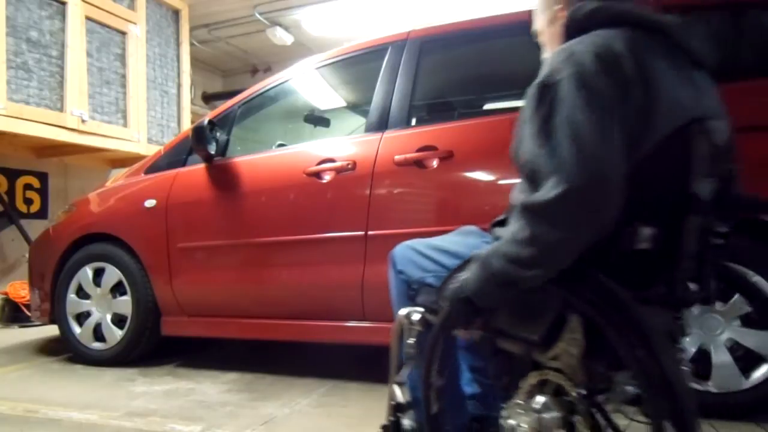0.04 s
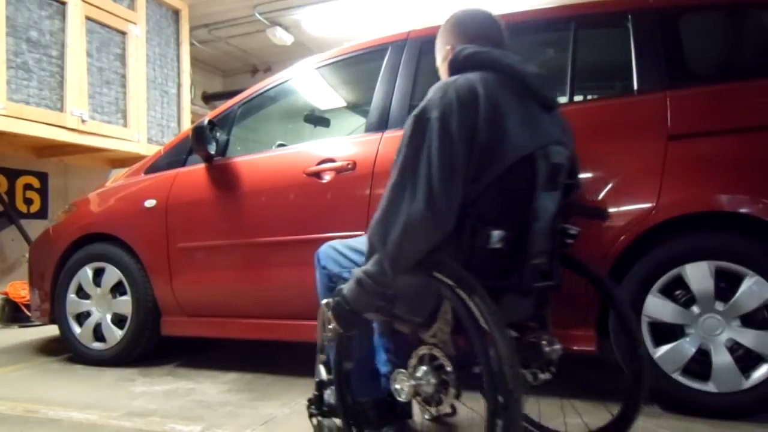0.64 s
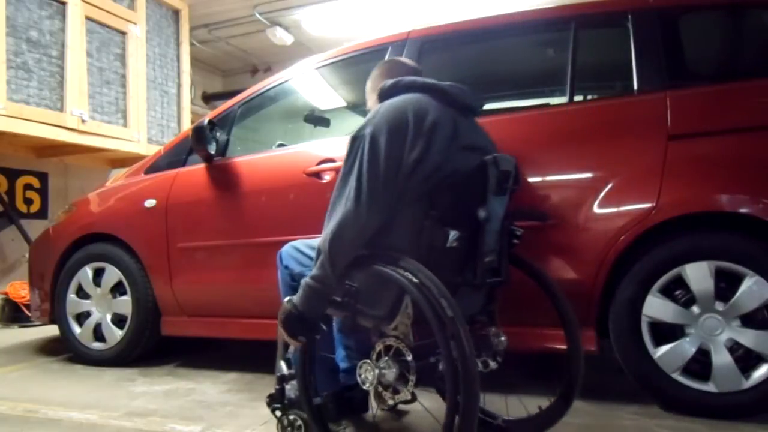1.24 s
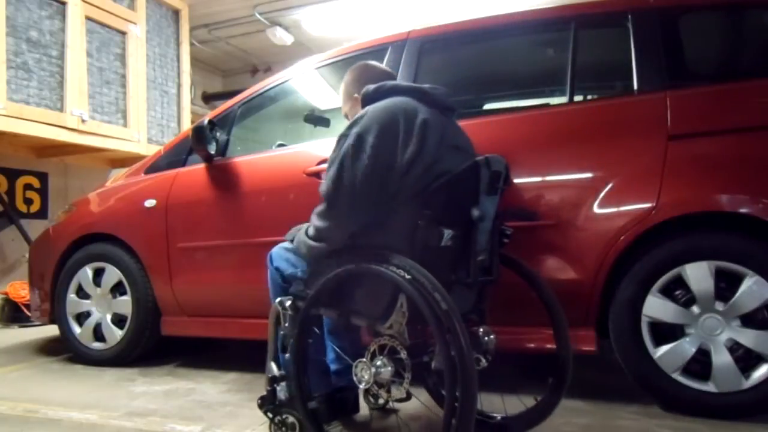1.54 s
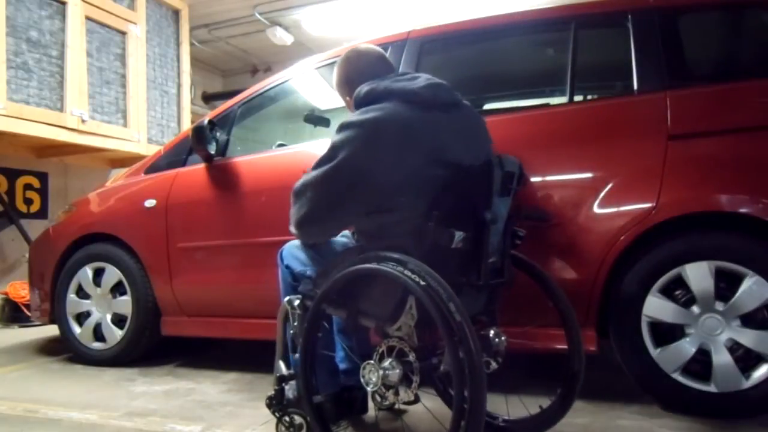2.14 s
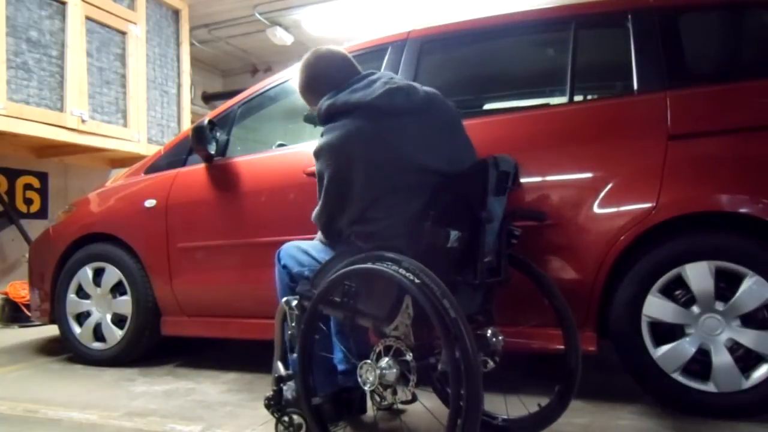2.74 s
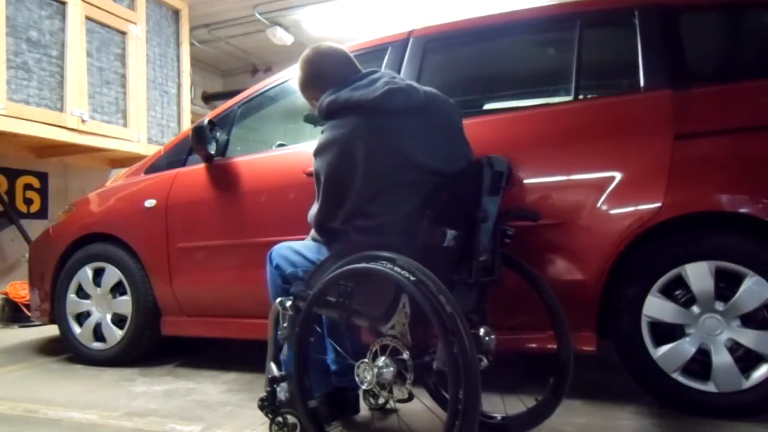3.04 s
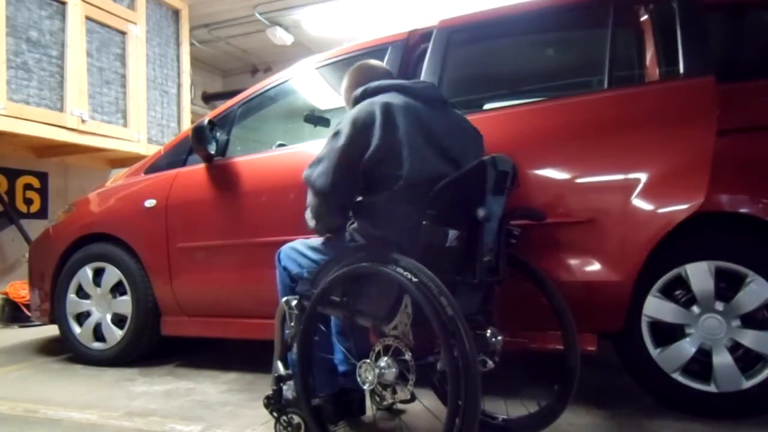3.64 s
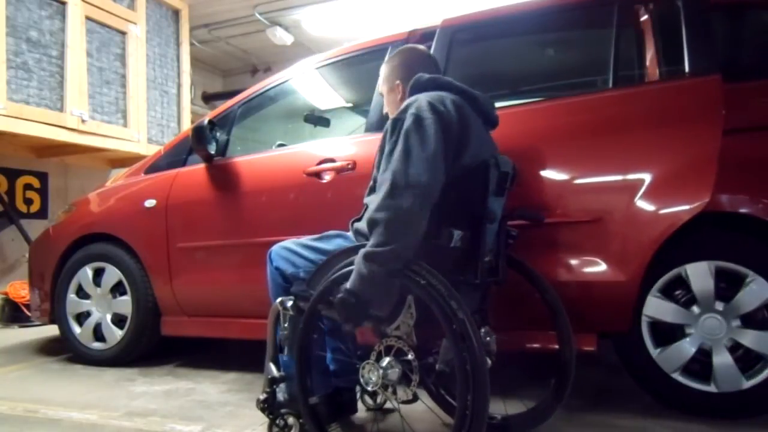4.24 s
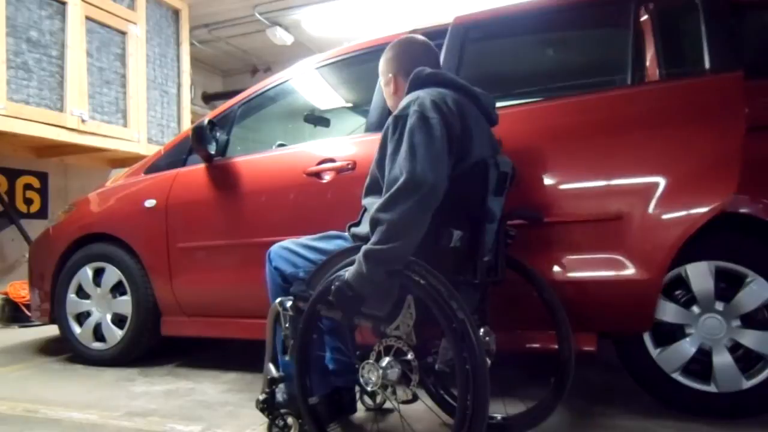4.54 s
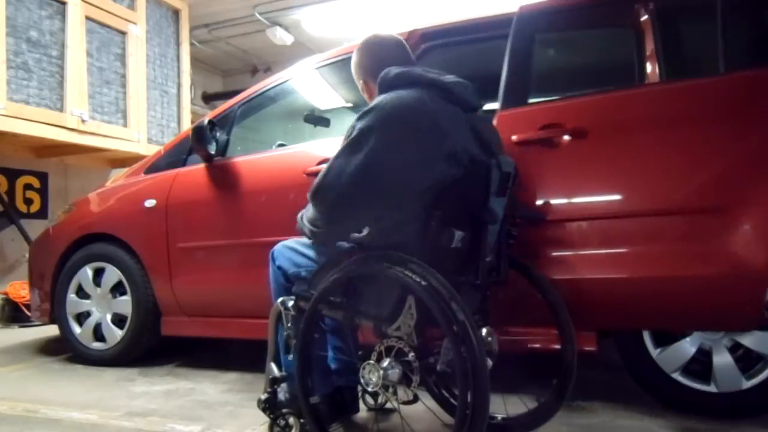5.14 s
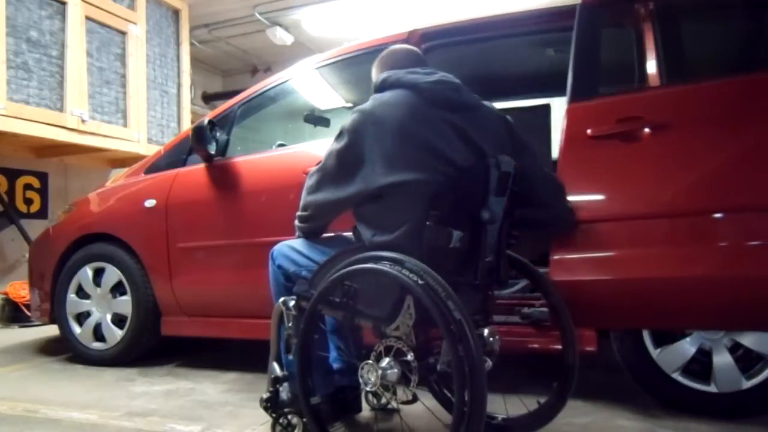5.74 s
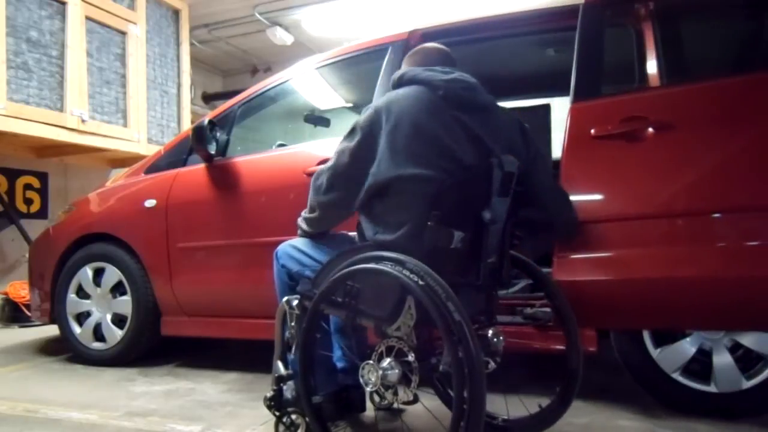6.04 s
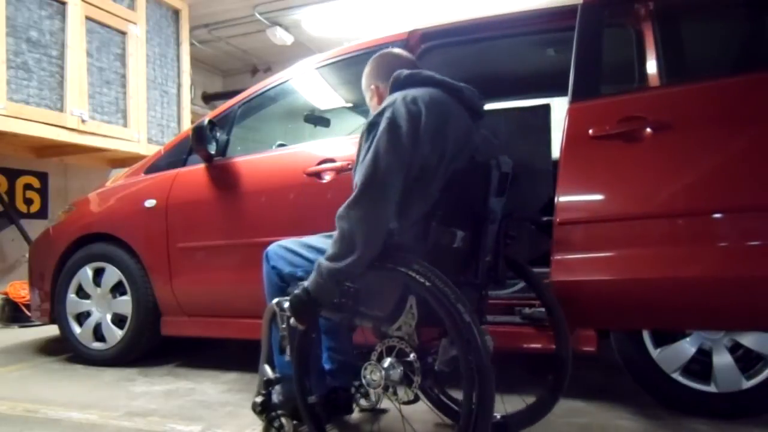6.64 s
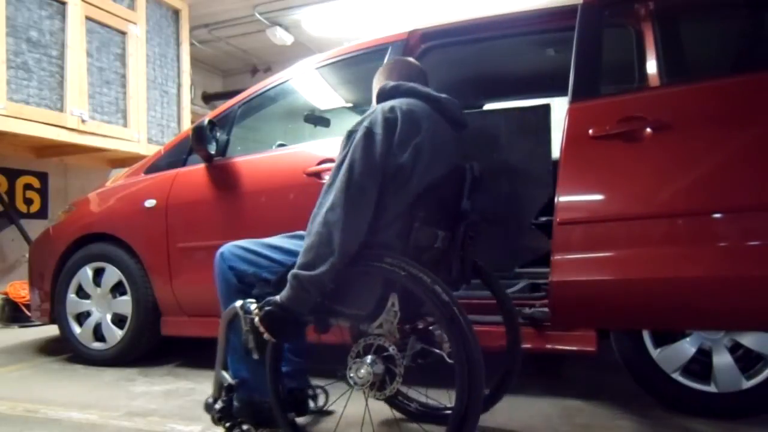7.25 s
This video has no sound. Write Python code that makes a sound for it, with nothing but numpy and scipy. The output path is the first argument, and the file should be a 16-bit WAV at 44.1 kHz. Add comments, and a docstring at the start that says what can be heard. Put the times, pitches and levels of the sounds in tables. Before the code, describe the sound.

A wheelchair rolls softly over concrete, its push rims hissing and its metal frame ticking and clanking. A van's sliding door then unlatches with a knock and a loud hollow bang, rumbles back along its track, and ends with sharp clacks and a low thump. The chair clanks again. Heard from close by, every knock rings in a bare garage.

```python
"""Wheelchair and van door in a garage

A wheelchair rolls up to a van, its frame ticking and clanking as it is turned and stopped.
The van's sliding door is unlatched, bangs, rumbles back along its track and thumps into its rubber stop.
The bare garage rings after every knock; a small stereo camera stands close by."""
import sys
import numpy as np
from scipy import signal
from scipy.fft import rfft, irfft, next_fast_len
from scipy.io import wavfile
from scipy.ndimage import map_coordinates

SR = 44100
rng = np.random.default_rng(int(sys.argv[2]) if len(sys.argv) > 2 else 0)


def generate_wav(sig):
    """Save sig (samples, or channels by samples) to the path in sys.argv[1] as 16-bit PCM at SR."""
    pcm = np.round(np.clip(np.atleast_2d(sig).T, -1, 1) * 32767).astype(np.int16)
    wavfile.write(sys.argv[1], SR, pcm)


N = 321489

# struck metal, broad spectrum: f/Hz, level/dB
METAL_SPECTRUM = [(59, -48), (100, -16.5), (216, -2), (255, 2.5), (403, -4.5), (507, -3.5), (852, -1.5),
                  (1270, -0.5), (1560, -7.5), (2460, -2.5), (4500, -4.5), (7260, -5), (8760, -6),
                  (11200, -4), (14400, -13)]
# its resonances: f/Hz, width/Hz, level/dB re spectrum
METAL_RESONANCES = [(482, 88, 4.5), (1005, 22, 1.8), (1180, 71, 2.3), (3540, 32, 0.71), (8020, 450, 2),
                    (9920, 220, 5.2), (11150, 120, 1.7), (11170, 55, 2.9)]
# stereo width of scattered sound: f/Hz, side/dB re mid
SCATTERED_WIDTH = [(60, -21), (300, -37), (700, -17.5), (2200, -7.5), (4200, -3.5), (8000, 2)]


def amp(db):
    """Decibels to gain."""
    return 10 ** (np.asarray(db) / 20)


def unit(x):
    """Scale to rms 1."""
    return x / np.sqrt(np.mean(x ** 2) + 1e-20)


def along(points, hz):
    """Interpolate (f/Hz, value) points on a log axis."""
    f, v = np.transpose(points)
    return np.interp(np.log(hz + 1), np.log(f), v)


def curve(points):
    """Interpolate (t/s, value) points per sample."""
    return np.interp(np.arange(N) / SR, *np.transpose(points))


def since(s):
    """Seconds since s, 0 before."""
    return np.maximum(np.arange(N) / SR - s, 0)


def wobble(rate_hz):
    """Smooth random curve, rate_hz knots a second."""
    knots = rng.standard_normal(int(N * rate_hz / SR) + 4)
    return map_coordinates(knots, [np.arange(N) * rate_hz / SR])


def grit(rate_hz, life_s):
    """Specks give random, fading jolts."""
    jolts = (rng.random(N) < rate_hz / SR) * rng.random(N)
    return signal.lfilter([1], [1, -np.exp(-1 / (life_s * SR))], jolts)


def add(track, s, sound):
    """Mix sound into track at s seconds."""
    start = max(round(s * SR), 0)
    part = track[:, start:start + sound.shape[1]]
    part += sound[:, :part.shape[1]]


def filtered(x, response):
    """Zero-phase filter with gain response(hz)."""
    n = x.shape[-1]
    m = next_fast_len(n + SR // 10)
    return irfft(rfft(x, m) * response(np.fft.rfftfreq(m, 1 / SR)), m)[..., :n]


def colour(spectrum, modes=()):
    """Response of a broad spectrum with resonances on it."""
    def response(hz):
        peaks = sum(amp(db) ** 2 / (1 + (2 * (hz - f) / width) ** 2) for f, width, db in modes)
        return amp(along(spectrum, hz)) * np.sqrt(1 + peaks)
    return response


def resonance(pitch_hz, width_hz):
    """Response of one steep-sided resonance."""
    def response(hz):
        damping = (1.5 * width_hz * hz) ** 2
        return damping / (damping + (hz ** 2 - pitch_hz ** 2) ** 2)
    return response


def noise(response, size=N, width=None):
    """Coloured stereo noise, rms 1; the close microphones agree best at low frequencies."""
    # stereo width of near sound: f/Hz, side/dB re mid
    near_width = [(60, -31), (250, -51), (700, -22), (2200, -19), (4200, -7), (9000, -2.5)]
    mid, side = filtered(rng.standard_normal((2, size)), response)
    side = filtered(side, lambda hz: amp(along(width or near_width, hz)))
    return unit(np.array([mid + side, mid - side]))


def ring(response, t60_s, attack_s, crack=0):
    """Crowded modes struck at once: decaying noise after a brief contact crack."""
    t = np.arange(int(SR * np.clip(t60_s, 0.05, 2))) / SR
    fade = amp(-60 * t / max(t60_s, 0.003)) * (1 - np.exp(-t / attack_s))
    fade *= 1 + crack * np.exp(-t / 0.00057)
    sound = noise(response, size=len(t)) * fade
    return unit(sound) * np.sqrt(np.mean(fade ** 2))


def small_parts(rows):
    """Each struck part rings in one resonance."""
    out = np.zeros((2, N))
    for s, db, hz, width_hz, t60_s in rows:
        add(out, s, amp(db) * ring(resonance(hz, width_hz), t60_s, attack_s=1 / hz + 0.0003))
    return out


def ringing(blows, modes):
    """Every (t/s, level/dB) blow rings all modes of a part."""
    return small_parts([(s, db + mode_db, hz, width_hz, t60_s)
                        for s, db, *_ in blows for hz, width_hz, t60_s, mode_db in modes])


def strikes(rows, response, thud_t60_ratio, click_t60_ratio, thud_hz, click_hz, crack):
    """Each blow wakes heavy parts (thud), panels (body) and the contact point (click)."""
    below = lambda hz, edge: 1 / np.sqrt(1 + (hz / edge) ** 8)
    above = lambda hz, edge: np.sqrt(1 - below(hz, edge) ** 2)
    thud = lambda hz: response(hz) * below(hz, thud_hz)
    body = lambda hz: response(hz) * above(hz, thud_hz) * below(hz, click_hz)
    click = lambda hz: response(hz) * above(hz, click_hz)
    out = np.zeros((2, N))
    for s, db, thud_db, click_db, t60_s in rows:
        add(out, s, amp(db + thud_db) * ring(thud, t60_s * thud_t60_ratio, attack_s=0.0074))
        add(out, s, amp(db) * ring(body, t60_s, attack_s=0.001, crack=crack))
        snap = ring(click, t60_s * click_t60_ratio, attack_s=0.00086, crack=crack)
        add(out, s, amp(db + click_db) * snap)
    return out


def rebounds(rows, t60_s, gap_s=0.0118, loss_db=3):
    """Loose metal strikes again and again, each time weaker."""
    return [(s + delay_s, db - loss_db * k, thud_db, click_db, t60_s)
            for s, rattle_s, db, thud_db, click_db in rows
            for k, delay_s in enumerate(np.arange(0, rattle_s, gap_s))]


def hush():
    """Steady, wide hush of the garage air."""
    # air: f/Hz, level/dB
    spectrum = [(12, -12), (20, 3.5), (120, -7.5), (214, -10.5), (297, -9.5), (360, -16), (437, -7.5),
                (515, -11), (1680, -18.5), (1830, -15.5), (2280, -19.5), (2480, -14), (7870, -21.5),
                (12900, -22.5), (14400, -21.5)]
    # resonance: f/Hz, width/Hz, level/dB re spectrum
    modes = [(2400, 180, 1)]
    # stereo width: f/Hz, side/dB re mid
    width = [(30, -8), (200, -0.5), (8000, -1.5)]
    return amp(-46) * noise(colour(spectrum, modes), width=width)


def garage_response():
    """Floor and van flank reflect at once; bare walls ring on, longest in the midrange."""
    # wall decay: f/Hz, t60/s
    decay = [(60, 0.42), (200, 0.82), (500, 1.95), (2000, 1.71), (5000, 0.98), (12000, 0.58)]
    # tail spectrum: f/Hz, level/dB re direct
    spectrum = [(60, -39.5), (200, 1), (500, -4), (2000, -4), (5000, -5.5), (12000, -12)]
    white = noise(np.ones_like, size=int(1.3 * SR), width=SCATTERED_WIDTH)
    hz, t, bins = signal.stft(white, SR, nperseg=256)
    t60_s = along(decay, hz)[:, None]
    fade = amp(-60 * t / t60_s) * np.sqrt(2 * np.log(1000) / (t60_s * SR))  # unit energy
    onset = 1 - np.exp(-t / 0.0076)
    tail = signal.istft(bins * fade * amp(along(spectrum, hz))[:, None] * onset, SR, nperseg=256)[1]
    early = ring(colour([(100, -24), (600, -2), (3000, -3)]), t60_s=0.24, attack_s=0.0089)
    add(tail, 0.004, amp(-6.5) * early / np.linalg.norm(early[0]))
    return tail


def garage_echo(x, count=12):
    """Garage reverberation; crossfaded random responses ring smoothly, without steady tones."""
    out, step = np.zeros((2, N)), N // count + 1
    for start in range(-step, N, step):
        span = np.arange(max(start, 0), min(start + 2 * step, N))
        windowed = x[:, span].mean(axis=0) * np.sin(np.pi * (span - start) / (2 * step))
        add(out, span[0] / SR, signal.fftconvolve([windowed], garage_response(), axes=1))
    return out


def chair_wheels():
    """Tyres roll on concrete; push rims slide through the hands, ticking now and then."""
    # rolling: t/s, level/dB
    rolling = [(0, -50.5), (.17, -49), (.3, -49.5), (.65, -49), (1.1, -56.5), (1.4, -53), (6.6, -48),
               (7.29, -59.5)]
    # tyre roar: f/Hz, level/dB
    tyre_spectrum = [(35, -35), (60, -5.5), (226, -10.5), (329, -6), (415, -25), (568, -15.5),
                     (2500, -16.5), (3250, -36), (5500, -120)]
    # rim slides: t/s, length/s, level/dB
    slides = [(0, 0.35, -62), (0.363, 0.43, -46.5), (2.02, 0.11, -46.5), (6.945, 0.19, -54.5)]
    # rim hiss: f/Hz, level/dB
    rim_spectrum = [(1470, -21), (2500, 10), (3940, -0.5), (4460, 5), (4840, 3), (11700, 6), (14400, -6.5)]
    attack_s, release_db_per_s = 0.041, 56
    rolling_db = curve(rolling)
    grip_power = amp(rolling_db - 6) ** 2  # light touch while rolling
    for s, length_s, db in slides:
        onset = np.minimum(since(s) / attack_s, 1)
        grip_power += (onset * amp(db - release_db_per_s * since(s + length_s))) ** 2
    friction = np.sqrt(grip_power) * amp(0.66 * wobble(200))
    rims = friction * (1 + 4 * grit(rate_hz=27, life_s=0.001)) * noise(colour(rim_spectrum))
    tyres = amp(rolling_db + 1.8 * wobble(20)) * noise(colour(tyre_spectrum))
    return rims + tyres


def metal_ticks():
    """Light metal parts tick."""
    # ticks: t/s, level/dB, f/Hz, width/Hz, t60/s
    ticks = [(0.2315, -15, 12300, 1600, 0.0089), (0.397, -18, 10800, 7000, 0.038),
             (0.792, -27, 3960, 9000, 0.014), (0.880, -27, 12600, 1200, .015),
             (1.5515, -16, 9400, 1200, 0.037), (2.5995, -32.5, 5500, 9000, .012),
             (2.959, -26, 2270, 1790, 0.19), (2.9655, -29, 8800, 7000, 0.23),
             (4.0315, -32, 9500, 6000, .025), (4.137, -35, 7450, 7000, .027),
             (4.4042, -13.5, 11100, 6000, 0.015), (4.745, -34, 6000, 9000, 0.11),
             (5.7659, -27.5, 8750, 9000, 0.032), (6.0297, -22, 9300, 3500, 0.026),
             (6.329, -30.5, 9200, 5300, .12), (7.146, -35.5, 3750, 300, 0.029)]
    return small_parts(ticks)


def chair_clanks():
    """Brake levers clank; the thud rings the frame tubes, the click a spring."""
    # clanks: t/s, rattle/s, body/dB, thud/dB re body, click/dB re body
    clanks = [(0.162, .005, -36, -26, -4), (0.612, .018, -41, -2, -3), (1.431, .005, -33, -5.5, -2.5),
              (1.4745, .018, -28.5, -12, 7.5), (1.51, .042, -26, -10, -6), (1.551, .005, -32.5, -29, 5),
              (1.593, .005, -33.5, -21, 9), (1.6, .005, -32, 2.5, -1), (4.404, .005, -29.5, -14.5, 13),
              (6.635, .066, -25, -8.5, 3), (6.7115, .03, -27.5, -13, 9), (6.746, .042, -16.5, -15.5, 7)]
    # tubes: f/Hz, width/Hz, t60/s, level/dB re thud
    frame_modes = [(474, 180, 0.21, 3.5), (844, 420, 0.22, -3.5)]
    # spring: f/Hz, width/Hz, t60/s, level/dB re click
    spring_modes = [(11400, 1400, 0.056, 0)]
    contacts = rebounds(clanks, t60_s=0.077)
    levers = strikes(contacts, colour(METAL_SPECTRUM, METAL_RESONANCES), thud_t60_ratio=3.05,
                     click_t60_ratio=0.93, thud_hz=358, click_hz=4020, crack=0.46)
    frame = ringing([(s, db + thud_db) for s, db, thud_db, _, _ in contacts], frame_modes)
    spring = ringing([(s, db + click_db) for s, db, _, click_db, _ in contacts], spring_modes)
    return levers + frame + spring


def door_lock():
    """The lock works inside the hollow panel."""
    # thuds: t/s, level/dB, f/Hz, width/Hz, t60/s
    thuds = [(2.287, -38, 308, 150, 0.77), (2.345, -40, 397, 180, 0.33), (2.657, -37, 167, 111, 0.26)]
    return small_parts(thuds)


def moving(start_s, end_s, rise_s=0.073, fall_s=0.21):
    """1 while the door rolls, 0 at rest."""
    return curve([(start_s - rise_s, 0), (start_s, 1), (end_s, 1), (end_s + fall_s, 0)])


def roller_drone(speed_re_top_db, top_hz=195.7, width_hz=95, speed_exponent=0.26):
    """Narrow hum, rising in pitch with roller speed."""
    pitch_hz = top_hz * amp(speed_exponent * speed_re_top_db)
    phase = 2 * np.pi * np.cumsum(pitch_hz) / SR
    return unit(wobble(width_hz) * np.cos(phase) + wobble(width_hz) * np.sin(phase))


def door_rollers():
    """Rollers judder over the track: the door rumbles, the rail rasps, bearings hiss and sing."""
    # door rumble: f/Hz, level/dB
    rumble_spectrum = [(24, -46), (40, -37), (70, -9), (162, 2.5), (206, 2), (305, -13), (381, -7),
                       (400, -1.5), (520, -46), (880, -120)]
    # rail rasp: f/Hz, level/dB
    rail_spectrum = [(160, -10.5), (280, 1.5), (387, -2.5), (511, -0.5), (564, -4), (705, -6.5),
                     (1230, -15.5), (1940, -18), (3540, -24.5), (4000, -23), (5200, -59), (8800, -120)]
    # rail resonance: f/Hz, width/Hz, level/dB re spectrum
    rail_modes = [(613, 75, 0)]
    # bearing hiss: f/Hz, level/dB
    bearing_spectrum = [(2000, 6), (3000, -5), (4300, 3.5), (6000, -3), (8000, -2.5), (11800, -1.5),
                        (14400, -11)]
    # bearing song: f/Hz, width/Hz, level/dB
    bearing_modes = [(1860, 170, -6), (2190, 180, -11), (3100, 160, -1), (4200, 460, -1), (7260, 400, 6)]
    # long pull, door speed as loudness: t/s, level/dB
    pull = [(4.55, -49), (4.69, -42.5), (4.801, -35.5), (4.91, -31.5), (5.11, -33), (5.4, -32.5),
            (5.73, -37), (5.85, -36.5)]
    # coasting after a jolt: t/s, length/s, rasp/dB, rumble/dB, hiss/dB
    coasts = [(3.03, 0.56, -29.5, -30.5, -44), (3.87, 0.35, -32, -46.5, -55),
              (6.143, 0.31, -35.5, -37.5, -50.5)]
    judder, jolts = wobble(35), grit(rate_hz=50, life_s=0.012)
    rumble = unit(noise(colour(rumble_spectrum)) * amp(0.91 * judder))
    rasp = noise(colour(rail_spectrum, rail_modes), width=SCATTERED_WIDTH)
    rasp = unit(rasp * amp(1.7 * judder) * (1 + 0.4 * jolts))
    hiss = noise(colour(bearing_spectrum), width=SCATTERED_WIDTH)
    hiss = unit(hiss * amp(1.8 * wobble(350)) * (1 + 1.3 * jolts))
    song = unit(sum(amp(db + 2.8 * wobble(11)) * noise(resonance(hz, width_hz), width=SCATTERED_WIDTH)
                    for hz, width_hz, db in bearing_modes))  # each mode flutters on its own
    speed_db, age_s = curve(pull), since(pull[0][0])
    speed_re_top_db = speed_db - speed_db.max()
    bass = rumble + amp(-1) * roller_drone(speed_re_top_db)
    rolling = rasp + amp(2.5 - 4.5 * age_s) * bass + amp(-10 + 6 * age_s) * hiss  # thins with travel
    singing = amp(-47 + speed_re_top_db) * song * (1 + 1.1 * jolts)
    out = moving(pull[0][0], pull[-1][0]) * (amp(speed_db) * rolling + singing)
    for s, length_s, rasp_db, rumble_db, hiss_db in coasts:
        age_s = since(s)
        out += moving(s, s + length_s) * (amp(rasp_db - 21 * age_s) * rasp
                                          + amp(rumble_db - 11.5 * age_s) * rumble
                                          + amp(hiss_db - 2 * age_s) * hiss)
    return out


def door_catch():
    """The roller rides over the hold-open catch and snaps in behind it."""
    # clacks: t/s, rattle/s, body/dB, thud/dB re body, click/dB re body
    clacks = [(5.873, .018, -17.5, -16, 2.5), (5.925, .018, -13.5, -13, 10.5)]
    # catch: f/Hz, width/Hz, t60/s, level/dB re body
    modes = [(1040, 180, 0.11, -7.5), (1400, 880, 0.14, -6.5), (2100, 790, 0.1, -9.5),
             (3540, 200, 0.07, -8)]
    contacts = rebounds(clacks, t60_s=0.052)
    snaps = strikes(contacts, colour(METAL_SPECTRUM, METAL_RESONANCES), thud_t60_ratio=3.1,
                    click_t60_ratio=0.93, thud_hz=350, click_hz=4450, crack=0.32)
    return snaps + ringing(contacts, modes)


def door_blows():
    """Handle, latch and stops strike the hollow steel door; it rings and its skin sways on."""
    # blows: t/s, body/dB, thud/dB re body, click/dB re body
    blows = [(2.285, -39.5, 3, -18), (2.657, -47, 3, -14), (2.862, -43, 4.5, 2), (2.892, -36, 0, -2.5),
             (2.958, -17.5, -6, -16.5), (3.666, -31, -5, 2), (3.6786, -9, -3.5, -3.5),
             (3.685, -18.5, -4.5, 8.5), (3.713, -22, -14, 9.5), (3.984, -32.5, -4, -5),
             (4.885, -31, -12, 2), (6.038, -24, 7.5, -1.5), (6.091, -29, 10, -1.5)]
    # struck door: f/Hz, level/dB
    spectrum = [(29, -39), (50, -18), (263, 9.5), (366, -3), (561, -3), (632, -7.5), (923, -4.5),
                (1450, -13), (1920, -21.5), (2880, -15.5), (3830, -17), (5460, -21.5), (7090, -20),
                (11400, -20), (14400, -25)]
    # its resonances: f/Hz, width/Hz, level/dB re spectrum
    modes = [(127, 36, 12.5), (276, 5.8, 3), (454, 18, -20), (470, 75, 6.5), (970, 15, -5), (1050, 22, 1),
             (2020, 26, -12), (2650, 73, -22), (3900, 63, 6.5), (7400, 100, 5)]
    # panel ring: f/Hz, width/Hz, t60/s, level/dB re body
    panel_modes = [(142, 53, 0.18, 1), (249, 38, 0.23, -8.5), (393, 560, 0.36, -11),
                   (1970, 600, 0.32, -13.5), (3400, 1600, .18, -17)]
    # latch ping as the door comes free: t/s, level/dB
    pings = [(3.168, -28)]
    # latch: f/Hz, width/Hz, t60/s, level/dB re ping
    latch_modes = [(1400, 640, 0.12, 0.5), (5180, 410, 0.078, -3), (7300, 900, 0.09, -6),
                   (10500, 2300, 0.089, -9)]
    # skin sways: t/s, level/dB, t60/s
    sways = [(2.958, -28.5, 0.98), (3.68, -42, .45), (5.93, -32, 1.5), (6.04, -30, 1.85)]
    contacts = [(s, db, thud_db, click_db, 0.22 * amp(0.083 * thud_db))  # more thud, longer t60
                for s, db, thud_db, click_db in blows]
    out = strikes(contacts, colour(spectrum, modes), thud_t60_ratio=1.15,
                  click_t60_ratio=0.55, thud_hz=340, click_hz=3700, crack=0.51)
    out += ringing(blows, panel_modes) + ringing(pings, latch_modes)
    skin = colour([(15, -15), (28, 23.5), (45, 5), (85, 10.5), (150, -5), (400, -90)])
    for s, db, t60_s in sways:
        add(out, s, amp(db) * ring(skin, t60_s, attack_s=0.0057))
    return out


def scene():
    """Door and chair in the garage, over its hush."""
    door = door_lock() + door_blows() + door_rollers() + door_catch()
    direct = door + chair_clanks() + metal_ticks()
    balance_db = [[-0.3], [0.3]]
    return (hush() + direct + garage_echo(direct) + chair_wheels()) * amp(balance_db)


def record(dry):
    """The camera rounds off peaks and limits the band."""
    cutoff_hz = 14220
    rounded = dry / (1 + np.abs(dry) ** 6) ** (1 / 6)
    return filtered(rounded, lambda hz: 1 / np.sqrt(1 + (hz / cutoff_hz) ** 300))


dry = scene()
out = record(dry)
generate_wav(out)
```